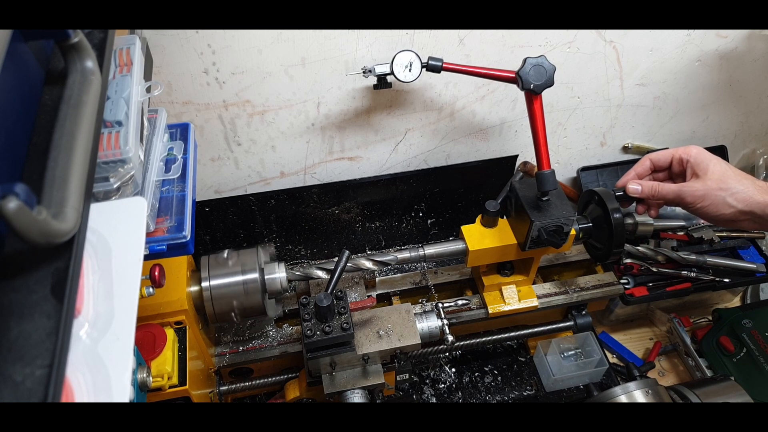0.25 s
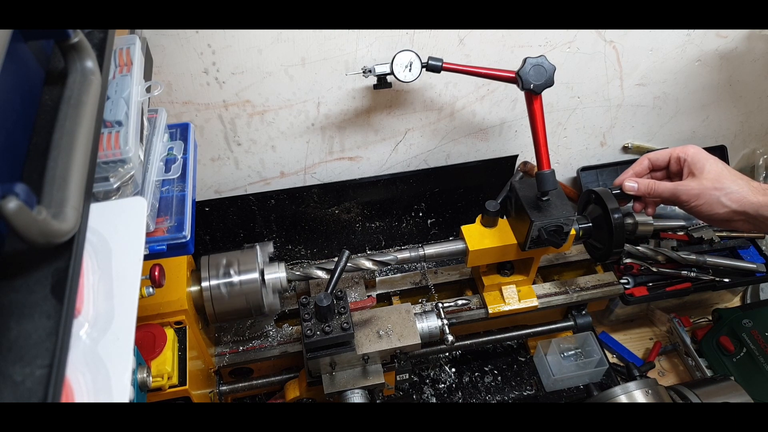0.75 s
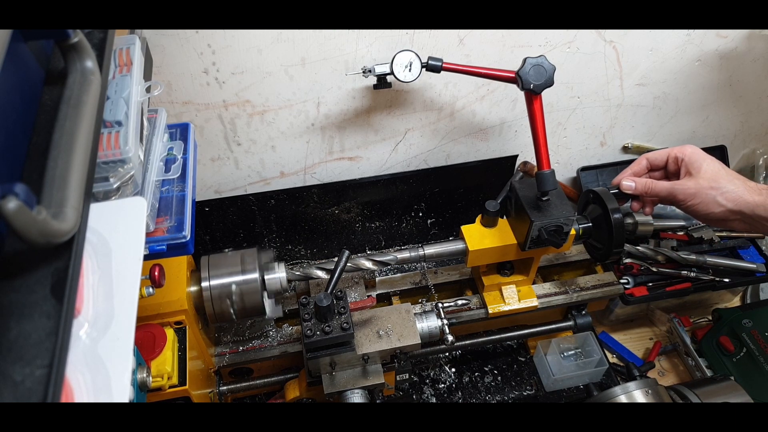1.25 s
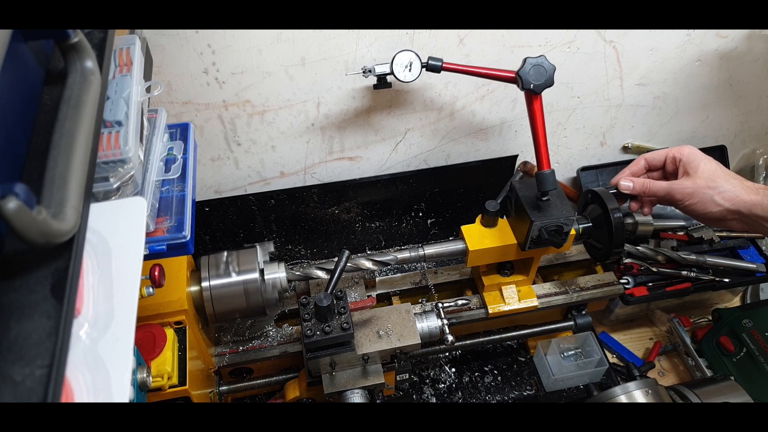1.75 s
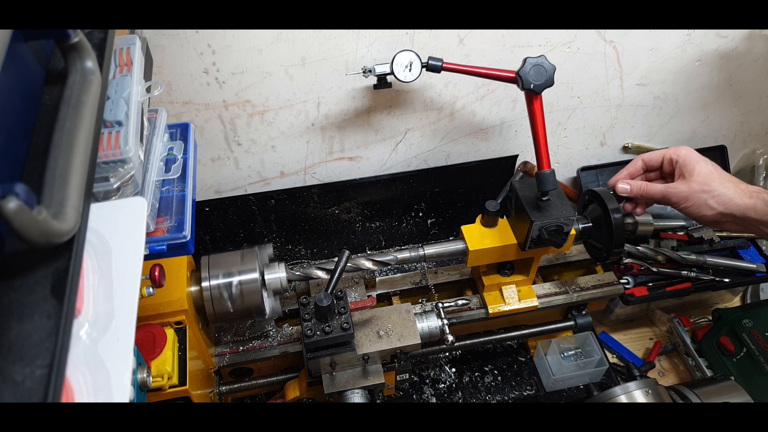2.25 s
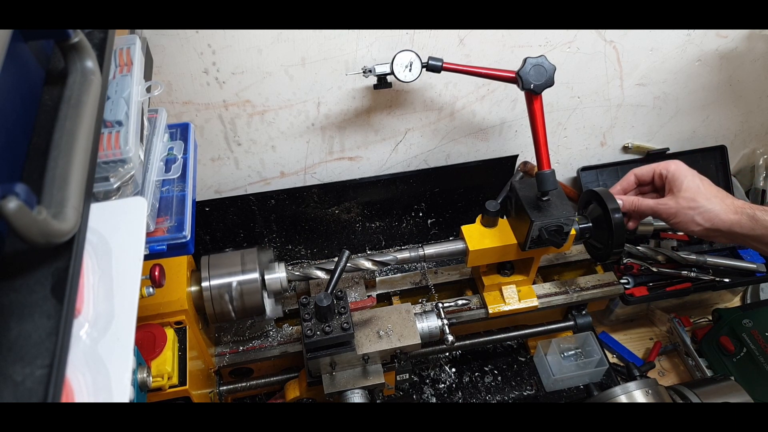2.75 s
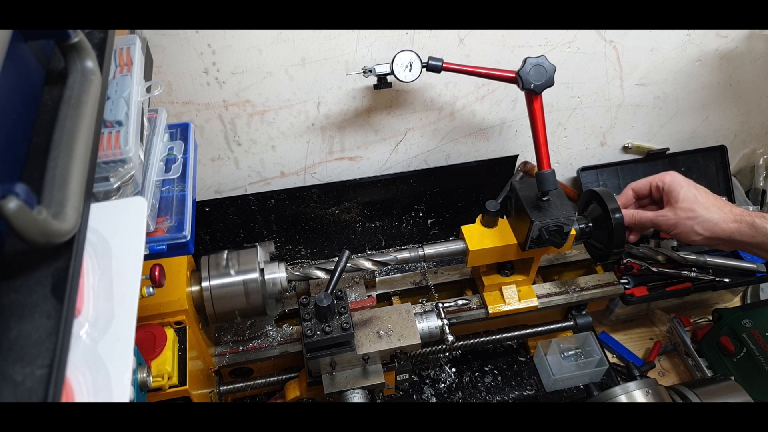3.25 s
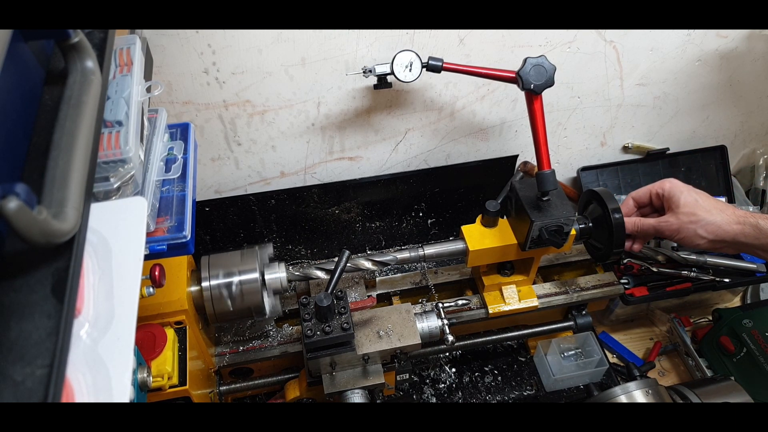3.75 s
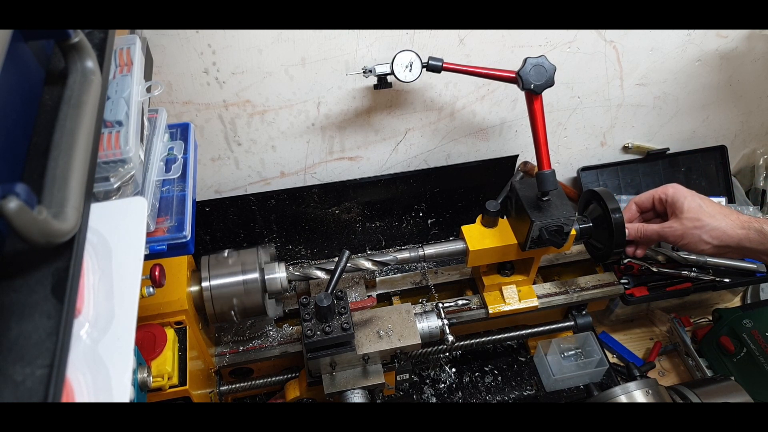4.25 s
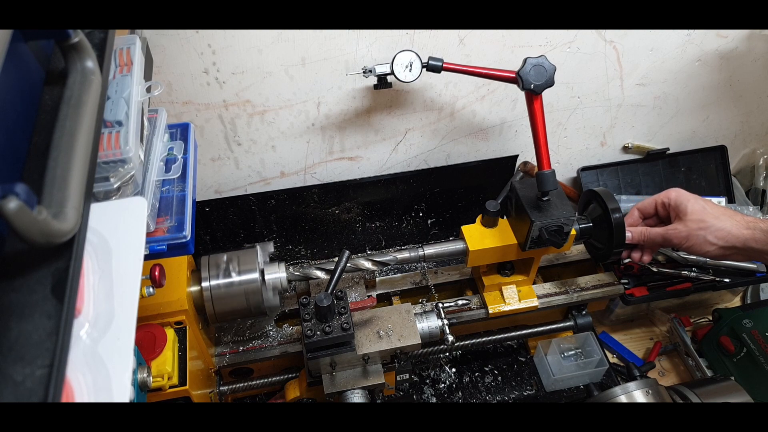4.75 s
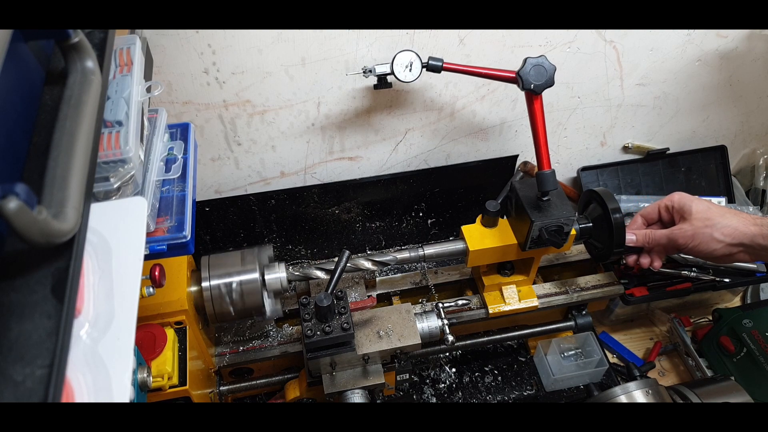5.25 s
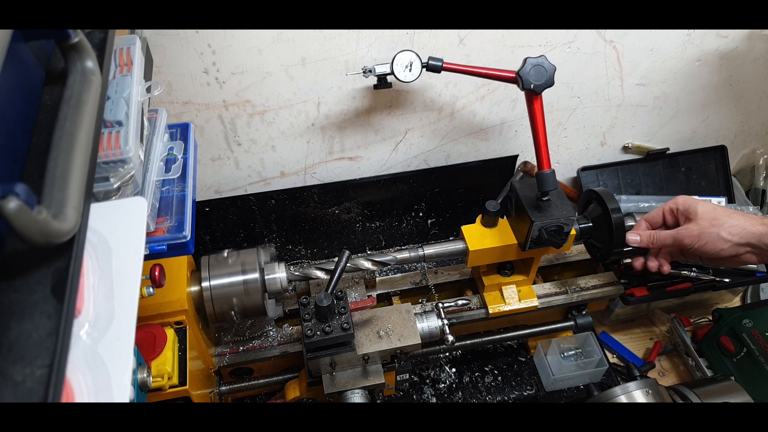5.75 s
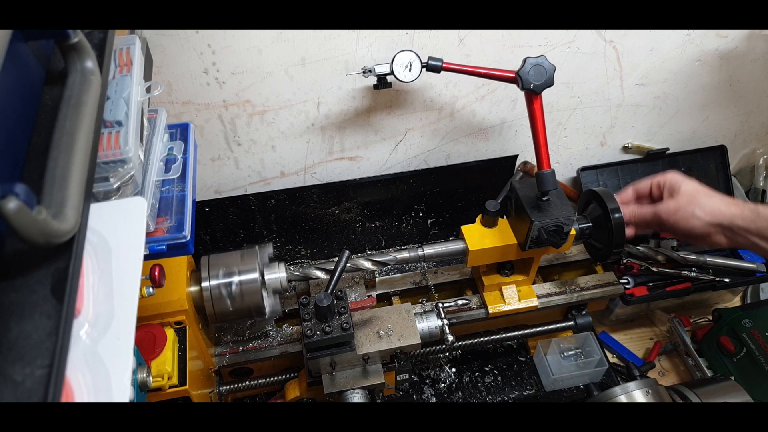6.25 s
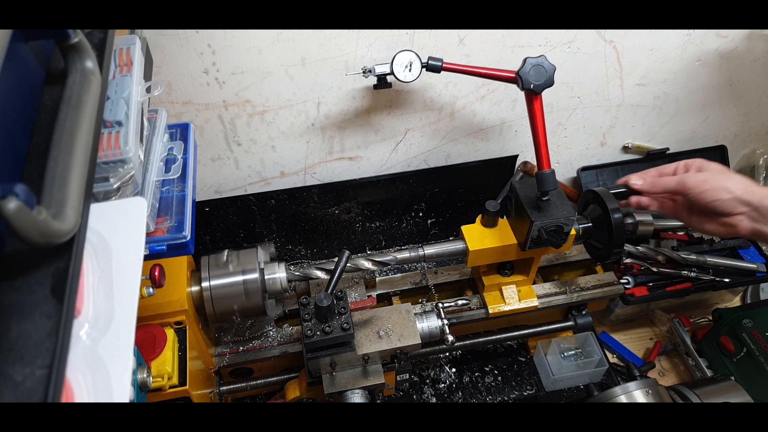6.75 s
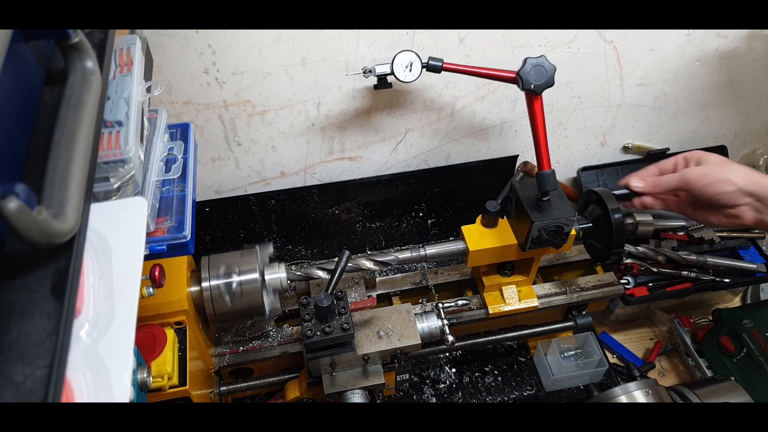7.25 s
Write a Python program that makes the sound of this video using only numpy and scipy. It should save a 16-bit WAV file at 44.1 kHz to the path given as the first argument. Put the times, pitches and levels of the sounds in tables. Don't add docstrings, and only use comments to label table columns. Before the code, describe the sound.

Close to a small metal lathe, steady hum and gear whirr lie under a pulsing drill cut. Stronger and weaker bites alternate about eight times a second, each a buzzing honk with a metallic scrape. The bed groans and rings, the bites rise in pitch and grow forceful, some squealing faintly. At about six and a half seconds the cutting ceases, leaving quiet machine running in a small dry room.

```python
import sys
import numpy as np
from scipy import signal
from scipy.fft import rfft, irfft
from scipy.io import wavfile
from scipy.ndimage import uniform_filter1d

SR = 44100
rng = np.random.default_rng(int(sys.argv[2]) if len(sys.argv) > 2 else 0)


def inscribe(sig):
    pcm = np.round(np.clip(np.atleast_2d(sig).T, -1, 1) * 32767)
    wavfile.write(sys.argv[1], SR, pcm.astype(np.int16))


def volts_from_decibels(level):
    exponent = np.asarray(level, float) / 20
    return 10 ** exponent


N = 331191
T = np.arange(N) / SR

# time [s], share of the tip buried [0-1].
DEPTH = [(0, 0.23), (2.3, 0.02), (3.2, 0.8), (3.6, 1), (6.4, 1.0)]
# centre [s], chatter [dB], scrape [dB], pitch reached [Hz].
LEADING = [(-0.012, -33, -34, 299.9), (0.221, -27.5, -30.5, 322.7), (0.46, -26.5, -31.5, 326.6),
           (0.701, -31.5, -31.5, 318.3), (0.922, -29, -31.5, 319.3), (1.16, -30.5, -32, 296.5),
           (1.392, -28.5, -30, 335.5), (1.623, -24, -28, 400), (1.862, -22, -28, 400.2),
           (2.098, -24, -26.5, 406), (2.324, -22, -35, 386.4), (2.565, -37.5, -36.5, 311),
           (2.798, -20, -32, 395.4), (3.039, -23.5, -34.5, 361.4), (3.263, -21, -36.5, 357.4),
           (3.519, -24, -39.5, 442.5), (3.772, -23.5, -37.5, 445), (3.997, -26, -39, 461),
           (4.238, -22, -39.5, 450), (4.481, -18.5, -36, 457.6), (4.721, -19, -31, 448.8),
           (4.952, -23, -35, 440), (5.193, -22, -34, 455.4), (5.429, -21.5, -37, 492.5),
           (5.669, -22, -34.5, 490), (5.915, -21.5, -34.5, 495.4), (6.137, -22, -25, 512.4),
           (6.32, -28, -41.5, 419.5)]
# time [s], pressure [dB], groan centre [Hz], swing over one turn [dB].
FEED = [(0, -3.5, 347, -3), (0.3, 1, 393, -2.5), (0.75, 1.5, 392, 0.5), (1.5, 1.5, 362, -0.5),
        (2.2, 4, 398.3, -1), (2.45, 6, 403, -1), (2.9, 9, 390, 1), (3.3, 6.5, 404, 5), (3.7, 4, 433, 0.5),
        (4.1, 2, 425.2, 1.5), (4.9, 0.5, 464, -0.5), (5.6, 4, 444, 1.5), (6.05, 1.5, 455, -1.5),
        (6.3, 0.5, 440, 4.5), (6.45, -5, 387, 4)]
WITHDRAWN_S = FEED[-1][0]


def bites():
    # frequency [Hz], left-right level [dB].
    port_lean = [(290, -1), (380, -0.5), (420, 6.5), (447, -1.5), (475, 8.5), (505, 13.5)]
    steel_hz = [590, 918, 1028, 1170, 1418, 1830, 2130, 2368, 2570, 2754, 3014, 4760, 5540]
    # width [Hz], level shallow [dB], level deep [dB].
    steel_modes = [(60, -4.5, -28), (30.7, 0.5, 0), (20, -14, -3.5), (50.3, -11.5, -0.5), (39.96, -12, 1),
                   (43.4, -7.5, -9), (71.4, -9.5, -11), (80, -14, -10.5), (119, -7, -11.5), (70, -8, -14.5),
                   (35, -6, -12), (70, -11, -16.5), (45, -13, -30)]
    # multiple of the wag, level beside the wag [dB].
    wag_overtones = [(2, -20), (3, -25), (4, -36.5), (5, -35), (6, -34)]
    # centre [s], level [dB], length [s].
    squeals = [
        (5.12, -46, 0.042),
        (5.348, -43, 0.055),
        (5.595, -39.5, 0.052),
        (5.829, -30.5, 0.051),
        (6.065, -27.5, 0.047),
        (6.15, -29, 0.06),
        (6.271, -38.5, 0.066),
    ]
    # time [s], level [dB].
    tip_freedom = [(0, 1.5), (2.3, 1.5), (2.6, 5.5), (3.1, 2), (3.5, 0.5), (6.4, 3)]

    hz, chatter, scrape = grip()
    deep = buried(T)
    turns = np.cumsum(hz * (1 + 0.01235 * wander(59.6))) / SR
    wag = np.sqrt(2) * np.cos(2 * np.pi * turns) * chatter * volts_from_decibels(3.5 * np.tanh(wander(80)))
    wag = wag + volts_from_decibels(-12) * (resonate(wag, 388, 20) + resonate(wag, 432, 22))

    slips = evened(sum(np.cos(2 * np.pi * k * turns) for k in range(2, 12)))
    slips = slips * volts_from_decibels(3.2 * np.tanh(wander(135)))
    overtones = sum(volts_from_decibels(db) * np.cos(2 * np.pi * k * turns) for k, db in wag_overtones) * chatter * deep
    spit = 2.0 + np.exp(-(turns % 1) / 0.38)

    squeal_level = sum(volts_from_decibels(db) * np.exp(-((T - s) / (0.55 * length_s)) ** 4) for s, db, length_s in squeals)
    squeal_hz = 1030 * (1 + 0.00433 * wander(27.0))
    squeal = squeal_level * np.sqrt(2) * np.sin(2 * np.pi * np.cumsum(squeal_hz) / SR)

    scrape = scrape * volts_from_decibels(3.5 * np.tanh(wander(120)))
    free_db = np.interp(T, *np.transpose(tip_freedom))
    fizz = scrape * (scrape / volts_from_decibels(-32)) ** 0.25 / volts_from_decibels(free_db)
    free = volts_from_decibels(17.0 + free_db)
    rub = volts_from_decibels(load()[0]["rub"] + 1.0) * (T < WITHDRAWN_S)
    pair = []
    for noise in rng.standard_normal((2, N)):
        strikes = 0.46 * slips + 0.5 * evened(spit * noise)
        drive = strikes * (scrape + volts_from_decibels(-33) * chatter) + rub * noise
        rings = np.zeros(N)
        for mode_hz, (width_hz, shallow_db, deep_db) in zip(steel_hz, steel_modes):
            mode_level = volts_from_decibels(shallow_db + deep ** 4.3 * (deep_db - shallow_db))
            rings += rng.choice([-1, 1]) * mode_level * resonate(drive, mode_hz, width_hz)
        swarf = volts_from_decibels(1.0) * metal(spit * noise) * fizz
        pair.append(free * rings + swarf + 1.32 * overtones + 1.24 * squeal)
    lean_db = read(port_lean, uniform_filter1d(hz, size=SR // 8)) - 2
    return ports(wag, wag, lean_db) + ports(*pair)


def grip():
    # centre [s], chatter [dB], scrape [dB], pitch reached [Hz].
    trailing = [(0.088, -31.5, -33.5, 288.7), (0.33, -34.5, -38.5, 289.5), (0.576, -38, -37, 287.5),
                (0.803, -34, -38.5, 290), (1.035, -36, -36.5, 290.2), (1.269, -33, -35, 292.7),
                (1.503, -35, -35, 282.1), (1.738, -35, -34.5, 289.6), (1.974, -35, -33, 326),
                (2.207, -28, -31.5, 392.5), (2.442, -29, -46, 373.2), (2.679, -28.5, -43, 403.3),
                (2.939, -40, -46, 450), (3.154, -36, -44, 343.7), (3.404, -26.5, -42.5, 436.7),
                (3.648, -29.5, -44, 436), (3.885, -28, -44, 493.5), (4.129, -32, -42, 482),
                (4.371, -26, -41.5, 441), (4.613, -20.5, -35, 442.9), (4.854, -23.5, -37.5, 442.6),
                (5.084, -27.5, -39.5, 464.2), (5.323, -23, -35.5, 505.6), (5.57, -21, -35.5, 507),
                (5.805, -20, -32, 519.7), (6.049, -20, -30, 504), (6.259, -25.5, -37, 511)]
    # time [s], pitch [Hz].
    catch_pitch = [(0, 289), (1.5, 288.8), (2.1, 305), (2.2, 377.4), (2.33, 374.3), (2.45, 431.3),
                   (2.68, 419.5), (2.8, 379), (3.1, 376), (3.26, 430), (3.52, 367.7), (3.9, 362),
                   (4.25, 410.5), (4.7, 445.5), (5.15, 488), (5.4, 462.4), (5.95, 468.3), (6.3, 504.5)]

    chatter, scrape, knots = np.zeros(N), np.zeros(N), []
    for k, (s, chatter_db, scrape_db, last_hz) in enumerate(LEADING + trailing):
        leads = k < len(LEADING)
        deep = buried(s)
        catch_hz = np.interp(s, *np.transpose(catch_pitch))
        first_hz = last_hz + (catch_hz - last_hz) * (1 if leads else 0.55)
        shoulder_s = 0.037 * np.sin(np.pi * deep) ** 2
        length_s = 0.066 - 0.014 * deep + 0.0018 * (chatter_db + 17) + shoulder_s
        length_s += 0.00038 * max(first_hz - 440, 0)

        part = slice(max(round((s - 0.15) * SR), 0), round((s + 0.25) * SR))
        since_s = T[part] - s
        u = since_s / length_s
        chatter[part] += volts_from_decibels(chatter_db) * np.exp(-np.where(u < 0, abs(u / 0.39) ** 4, abs(u / 0.4) ** 3.0))
        rebound = volts_from_decibels(chatter_db - 9.5) * np.exp(-((since_s - 0.058) / 0.014) ** 2)
        chatter[part] += leads * deep * rebound

        lead_s = 0.021 + deep * 0.001
        hold_s = 0.039 + deep * 0.008 + 1.38 * shoulder_s
        rise_s = 0.0015 + deep * 0.0105 + 0.21 * shoulder_s
        t = since_s + lead_s + 0.6 * shoulder_s
        fall = np.exp(-(np.maximum(t, 0) / hold_s) ** 2.15)
        scrape[part] += volts_from_decibels(scrape_db + 1.5) * fall / (1 + np.exp(-t / rise_s))

        knots += [(s - 0.045, 0.96 * first_hz), (s - 0.018, first_hz)]
        knots += [(s + 0.03 - 0.012 * deep, last_hz), (s + 0.04, 1.015 * last_hz)]
    return np.interp(T, *np.transpose(sorted(knots))), chatter, scrape


def buried(time_s):
    return np.clip(np.interp(time_s, *np.transpose(DEPTH)), 0, 1)


def metal(noise):
    # frequency [Hz], density [dB per Hz].
    mouth_spectrum = [(250, -70), (700, -39), (1000, -30), (1250, -11), (1640, -16), (2000, -16),
                      (2650, -4.5), (3750, -15), (5410, -16), (7630, -26.5), (11000, -25.5), (14000, -38),
                      (15600, -57)]
    # frequency [Hz], density [dB per Hz].
    deep_spectrum = [(650, -26.5), (1100, 0.5), (1260, -9.5), (1390, -3), (1680, -8), (2550, -7),
                     (3850, -12.5), (6480, -19), (7740, -34), (10600, -25), (15600, -33.5)]
    deep = buried(T)
    return (1 - deep) * evened(coloured(noise, mouth_spectrum)) + deep * evened(coloured(noise, deep_spectrum))


def cut():
    # frequency [Hz], width [Hz].
    frame_modes = [(388, 31), (432, 13.8), (478, 12.2), (505, 20.5)]
    # time [s], frequency [Hz], level beside groan [dB].
    shank_bend = [(0, 279, -9.5), (1.4, 296, -9), (2.2, 300.9, -8.5), (2.6, 314.1, -9.5), (2.9, 344.7, -9),
                  (3.5, 350.1, -8), (4.3, 352, -9.5), (5.0, 371, -17), (6.1, 384.2, -16.5),
                  (6.451, 400, -4.5)]
    # frequency [Hz], width [Hz], level [dB].
    rub_lines = [(1820, 16, -14.5), (2995, 10, -13), (5510, 16, -21)]
    # frequency [Hz], density [dB per Hz].
    rub_spectrum = [(560, -7.5), (950, 0.5), (1040, -2), (1380, 0.5), (1670, -11.5), (2540, -9.5),
                    (3650, -15), (5430, -15.5), (7800, -38), (11000, -21.5), (13400, -28), (15600, -43)]

    level, hz = load()
    shank_s, *shank = np.transpose(shank_bend)
    shank_hz, shank_db = (np.interp(T, shank_s, column) for column in shank)
    on = np.clip((WITHDRAWN_S - T) / 0.1, 0, 1)
    throb = volts_from_decibels(1.2 * wander(12))
    shelf = signal.butter(4, [540, 950], "band", fs=SR, output="sos")
    low = signal.butter(3, [100, 185], "band", fs=SR, output="sos")
    nearness = [np.exp(-((hz - f) / 75) ** 2) + 1e-9 for f, _ in frame_modes]
    pair = []
    for a, b, c, d in rng.standard_normal((2, 4, N)):
        groan = sum(near * evened(resonate(resonate(a, f, 1.84 * w), f, 1.84 * w))
                    for near, (f, w) in zip(nearness, frame_modes))
        groan = groan / np.linalg.norm(nearness, axis=0)
        bending = evened(resonate(resonate(d, shank_hz, 32.4), shank_hz, 26.6))
        groan = 0.74 * groan + volts_from_decibels(shank_db) * bending
        rub = evened(coloured(c, rub_spectrum))
        rub = rub + sum(volts_from_decibels(db) * evened(resonate(b, f, w)) for f, w, db in rub_lines)
        ring = evened(evened(resonate(b, 676.8, 21.6)) + 0.7 * evened(signal.sosfilt(shelf, c)))
        rumble = evened(signal.sosfilt(low, d))
        steady = volts_from_decibels(level["groan"]) * groan + volts_from_decibels(level["ring"] - 1.0) * ring + volts_from_decibels(level["rub"] + 7.0) * rub
        pair.append(on * (throb * steady + volts_from_decibels(level["rumble"] - 5.0) * rumble))
    return ports(*pair)


def load():
    layers = {"groan": (-31, 1.17, 0.7, 1.3), "ring": (-35.5, 0.78, -0.97, -7.5),
              "rub": (-53.5, 0.7954, -0.1, -2), "rumble": (-50, 0.75, -0.4, -24)}
    # time [s], rumble gain [dB].
    lurches = [
        (2.62, 13),
        (2.92, 7.1),
        (3.18, 6.3),
        (3.65, 8.36),
    ]

    s, *columns = np.transpose(FEED)
    pressure_db, hz, swing_db = (np.interp(T, s, column) for column in columns)
    turn = np.interp(T, np.transpose(LEADING)[0], np.arange(len(LEADING)))
    swing_db = swing_db * np.cos(2 * np.pi * (turn - 0.062))
    eased = np.clip((T - 6.06) / 0.079, 0, 1)
    level = {name: rest_db + slope * pressure_db + share * swing_db + eased * ease_db
             for name, (rest_db, slope, share, ease_db) in layers.items()}
    level["rumble"] += sum(db * np.exp(-((T - at_s) / 0.076) ** 2) for at_s, db in lurches)
    return level, hz


def motor():
    hum_hz = [100, 123.5, 200, 227, 300]
    # level loaded [dB], level free [dB].
    hum_levels = [(-52, -59.5), (-50.5, -60), (-56.5, -62), (-55, -59.5), (-61.5, -61.5)]
    # frequency [Hz], density [dB per Hz].
    idle_spectrum = [(30, -48), (60, -36), (80, -32), (110, -9), (300, 0), (550, -21), (900, -39),
                     (1100, -6), (3300, -18), (5000, -23), (7900, -34), (10500, -29), (13500, -30.5),
                     (15600, -37)]
    # frequency [Hz], width [Hz], level [dB rms].
    bed_modes = [(395, 27.6, -41.5), (690.6, 38, -43), (892, 67, -51.5), (55.5, 4.8, -60), (496, 93, -54),
                 (1392, 25, -62.5), (1795, 40, -65.5), (2890, 51, -71), (3370, 81, -70)]

    free = np.clip((T - 6.1) / 0.1, 0, 1)
    hum = np.zeros(N)
    for hz, (loaded_db, free_db) in zip(hum_hz, hum_levels):
        level_db = loaded_db + free * (free_db - loaded_db) + 1.3 * wander(9)
        drift = 1 + 0.004 * wander(4)
        hum += np.sqrt(2) * volts_from_decibels(level_db) * np.sin(2 * np.pi * np.cumsum(hz * drift) / SR)
    pair = []
    for noise in rng.standard_normal((2, N)):
        gears = volts_from_decibels(-48.5) * evened(coloured(noise, idle_spectrum))
        rung = sum(volts_from_decibels(db) * evened(resonate(resonate(noise, hz, 2.4 * w), hz, 1.07 * w))
                   for hz, w, db in bed_modes)
        pair.append(gears + rung)
    return ports(hum, hum) + ports(*pair)


def room(x, t60):
    size = SR // 2
    taps = rng.choice([-1., 1.], (2, size)) * (rng.random((2, size)) < 0.05)
    taps *= volts_from_decibels(-60 * T[:size] / t60) * (T[:size] > 0.003)
    return signal.fftconvolve(x, taps / np.linalg.norm(taps[0]), axes=1)[:, :N]


def ports(left, other, lean_db=0):
    # frequency [Hz], left-right likeness [0-1].
    likeness = [(60, 0.95), (300, 1), (520, 0.9), (650, 0.64), (1400, 0.24), (4000, 0.14), (15000, 0.072)]
    # frequency [Hz], left over right [dB].
    left_excess = [(60, 2.5), (110, 4.5), (200, 2.5), (380, 0.5), (700, 3.5), (1290, -0.5), (2380, -1),
                   (4400, -0.5), (8120, 2.5), (15000, 2)]
    # frequency [Hz], lead of the right port [radians].
    right_lead = [(30, 0), (700, 0.38), (1200, 2.5), (1500, 3), (1900, 20.5), (2800, -4), (4500, 9),
                  (15000, 41.5)]

    hz, near = np.fft.rfftfreq(N, 1 / SR), rfft(left)
    same = np.clip(read(likeness, hz), 0, 1)
    lean = volts_from_decibels(read(left_excess, hz) / 2)
    notch = 1 - 0.4 * np.exp(-((hz - 7880) / 500) ** 2)
    far = near if other is left else rfft(other)
    right = (same * np.exp(1j * read(right_lead, hz)) * near + np.sqrt(1 - same ** 2) * far) / lean
    left_out = irfft(notch * near * lean, N) * volts_from_decibels(lean_db / 2)
    right_out = irfft(notch * right, N) / volts_from_decibels(lean_db / 2)
    return np.array([left_out, right_out])


def evened(x):
    return x / np.sqrt(np.mean(x ** 2) + 1e-20)


def read(points, hz):
    f, value = np.transpose(points)
    return np.interp(np.log(hz + 1), np.log(f + 1), value)


def resonate(x, hz, width_hz):
    turn = np.exp(2j * np.pi * np.cumsum(hz * np.ones(N)) / SR)
    r = np.exp(-np.pi * width_hz / SR)
    return 2 * (turn * signal.lfilter([1 - r], [1, -r], x / turn)).real


def coloured(x, points):
    return irfft(rfft(x) * volts_from_decibels(read(points, np.fft.rfftfreq(N, 1 / SR))), N)


def wander(per_s):
    size = round(SR / per_s)
    return evened(uniform_filter1d(uniform_filter1d(rng.standard_normal(N), size), size))


def scene():
    near = bites()
    return near + volts_from_decibels(-9.5) * room(near, t60=0.12) + cut() + motor()


def top_cut(x):
    return signal.sosfilt(signal.butter(12, 15710, fs=SR, output="sos"), x)


def record(dry):
    heard = signal.sosfilt(signal.butter(2, 35, "high", fs=SR, output="sos"), dry)
    power_db = 10 * np.log10(abs(uniform_filter1d((heard ** 2).mean(0), 500)) + 1e-12)
    heard = heard / volts_from_decibels(0.29 * np.maximum(power_db + 15.5, 0))
    band_limit = signal.firwin(511, 15750, window=("kaiser", 9), fs=SR)
    heard = signal.oaconvolve(heard, band_limit[None], "same")
    return top_cut(heard)


dry = scene()
out = record(dry)
inscribe(out)
```